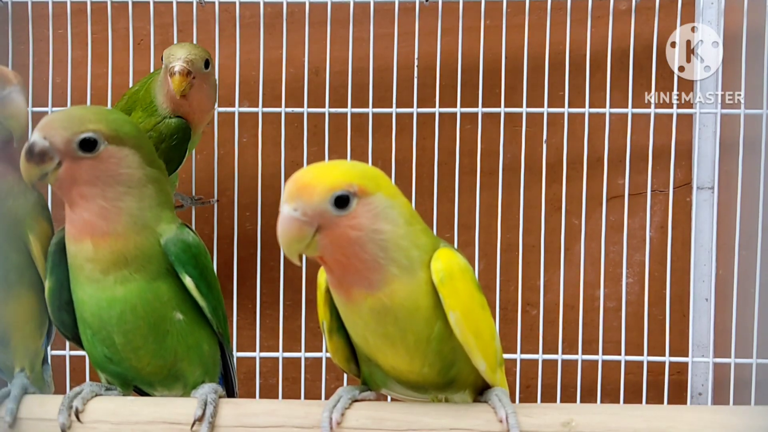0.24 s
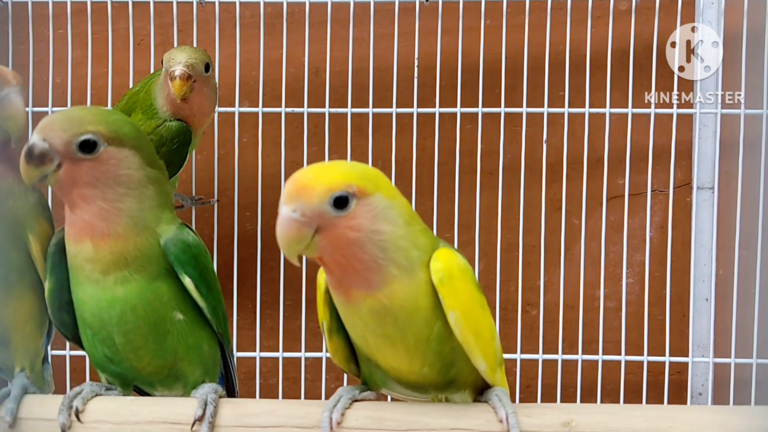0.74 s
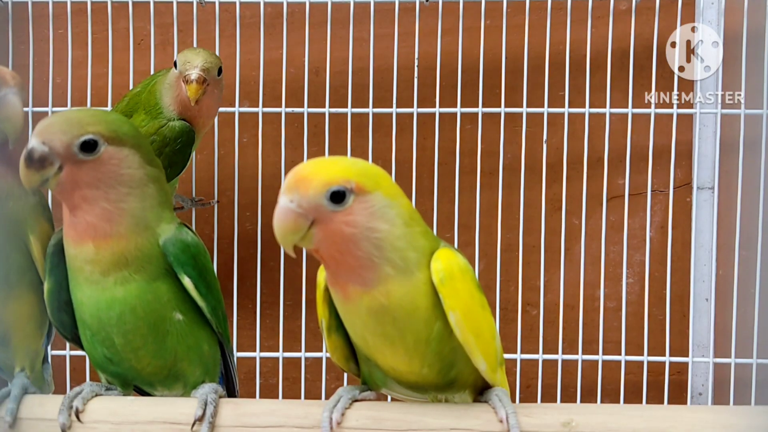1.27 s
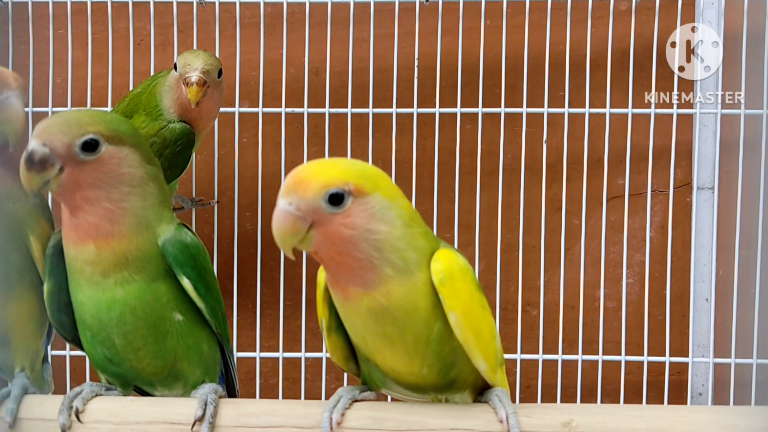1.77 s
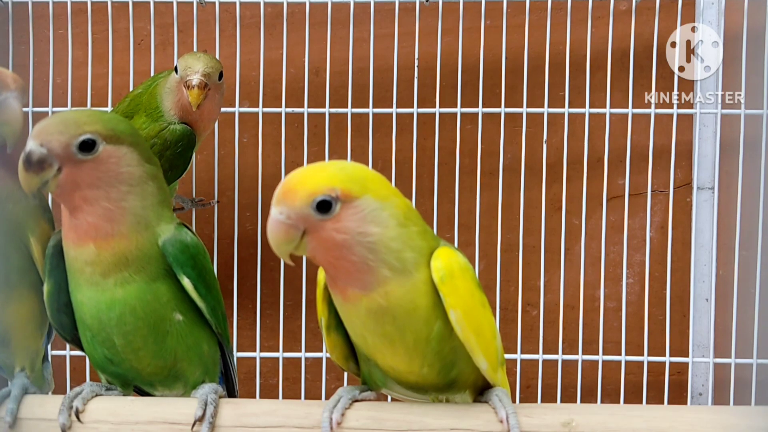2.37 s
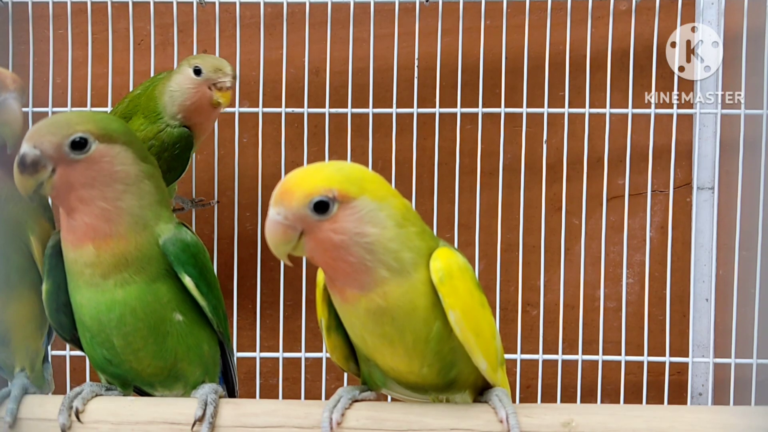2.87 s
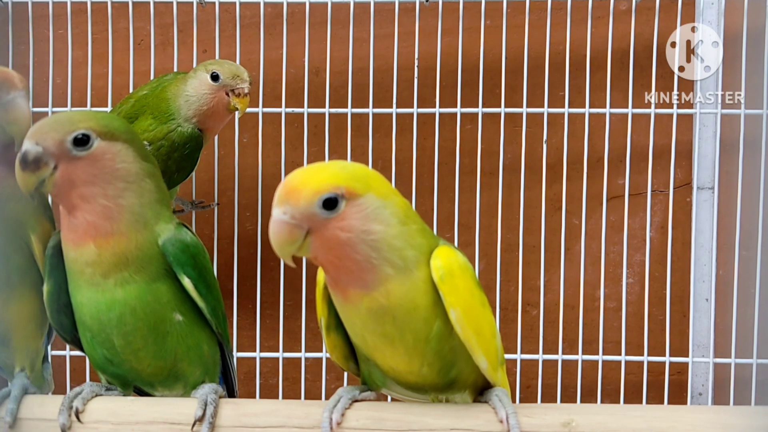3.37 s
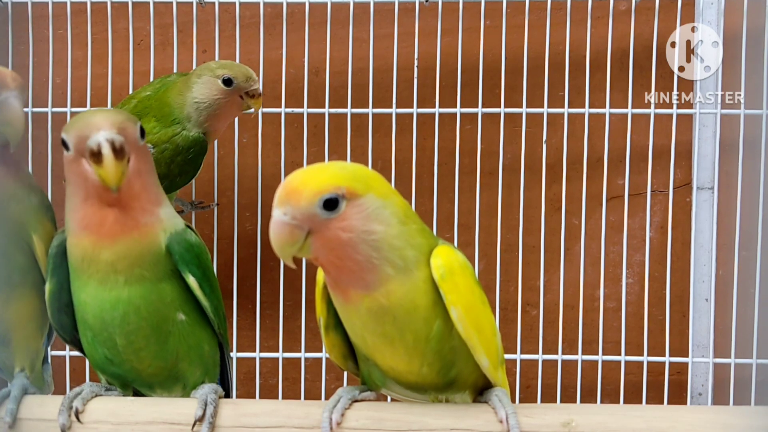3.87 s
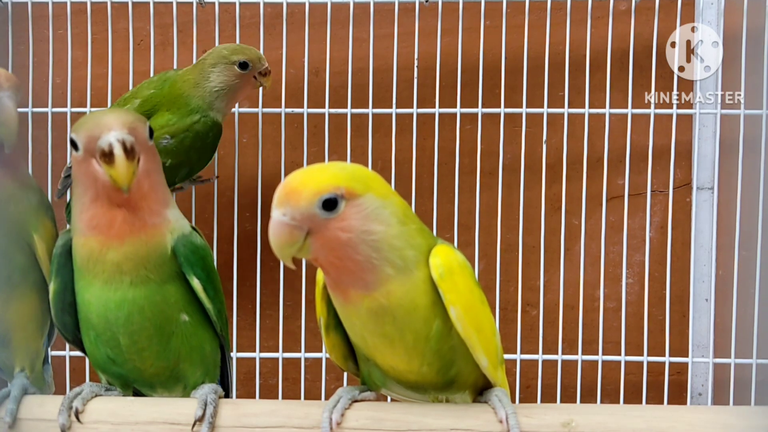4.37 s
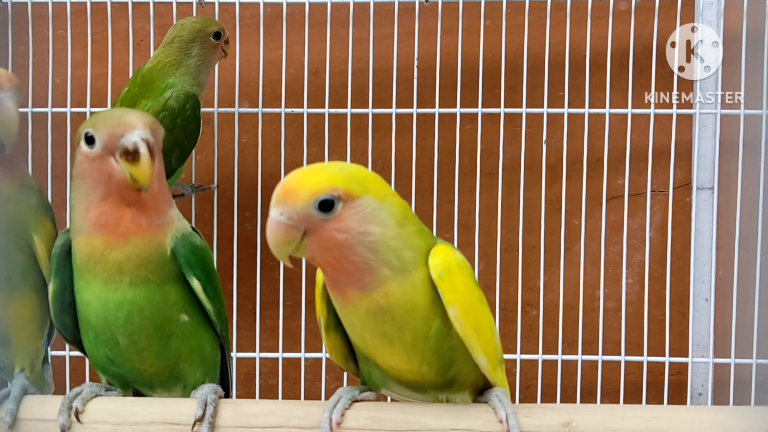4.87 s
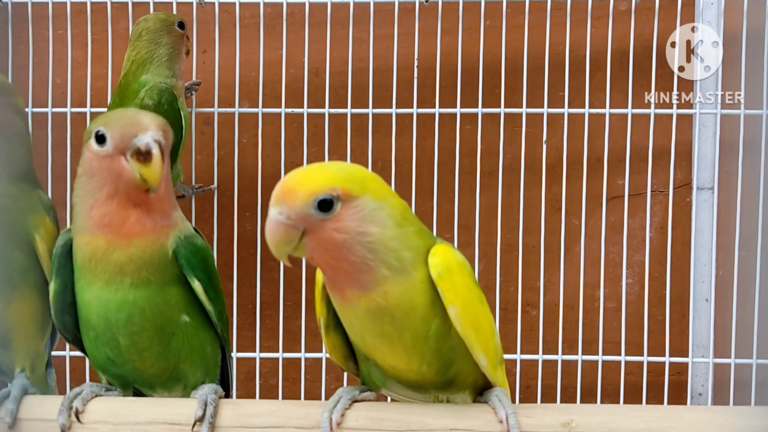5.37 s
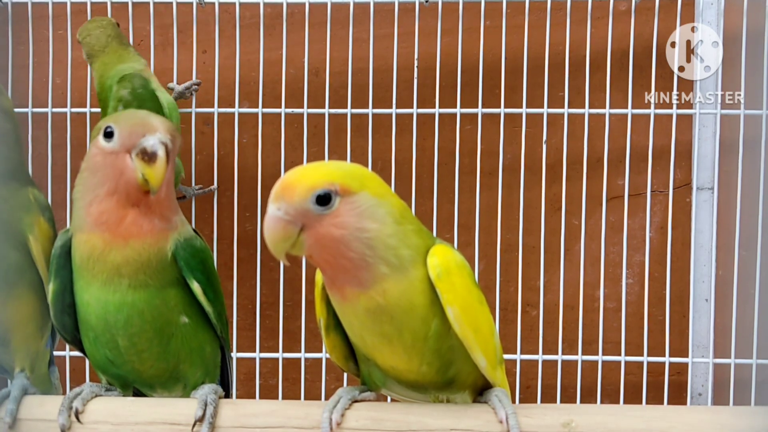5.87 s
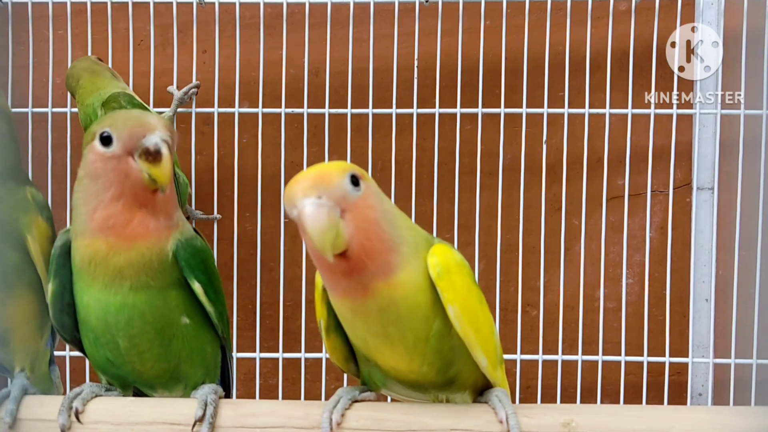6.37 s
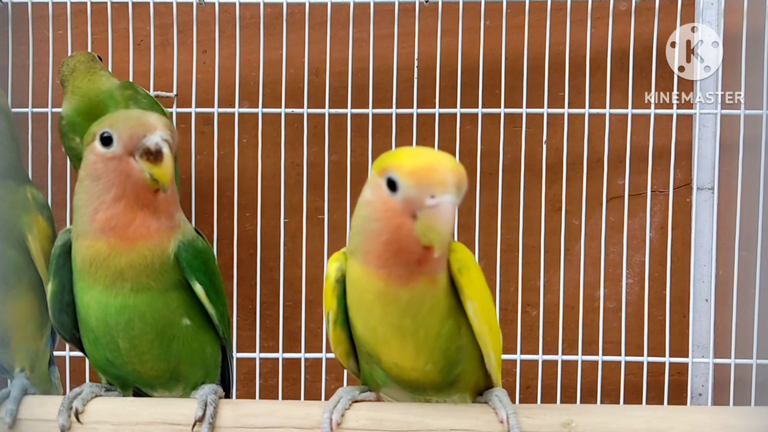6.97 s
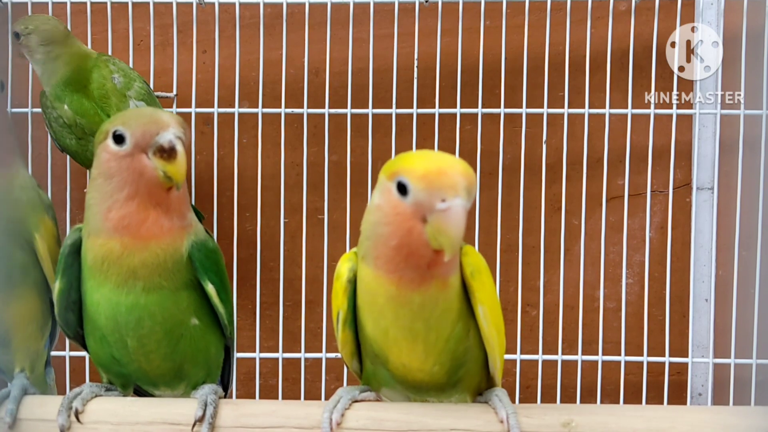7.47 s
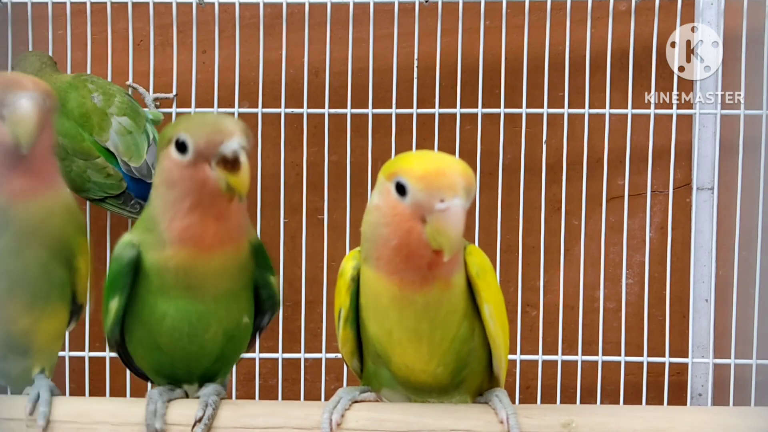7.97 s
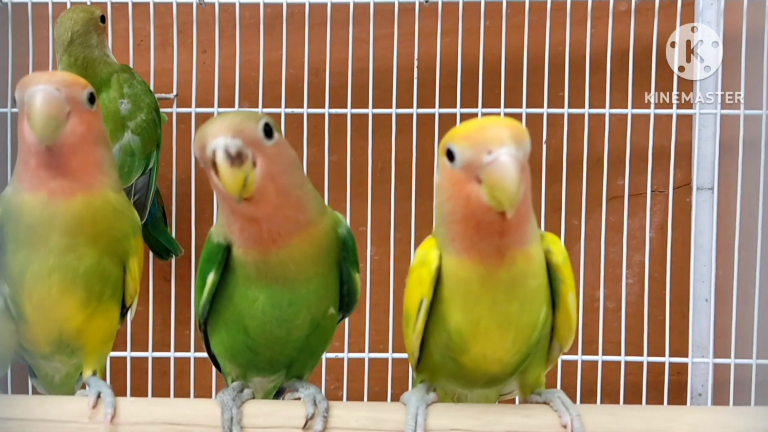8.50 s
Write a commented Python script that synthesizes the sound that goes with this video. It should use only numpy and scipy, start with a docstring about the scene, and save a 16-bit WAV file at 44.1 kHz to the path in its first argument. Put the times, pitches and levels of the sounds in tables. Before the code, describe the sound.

Close stereo microphone, small hard room, quiet low-heavy room tone. At 0 s the tail of a chirp runs into a shrill, raspy stepped chirp, another at 0.1; each lasts about a twentieth of a second. A very faint one follows at 0.35, with a soft low hum fading by 1.3. Two loud, lower, harsh chirps come at 1.2 and 1.3, one at 3.2, each loud one with a dull microphone thump. A faint far crow calls between 0.5 and 4; distant echoing whistles slide mostly downward from 2 to 6.4. Light wire ticks at 4.3 and 4.5 precede three soft chirps from 4.5, then loud ones at 4.8 and 4.9. Another chirps at 6.2. From 6.4 a faint motor whine rises over hiss and holds; soft perch knocks around 6.5-7.1. At 8.1-8.35 a hop brings claw scrapes, gusts and rattle, then three piercing chirps at 8.4, 8.45 and 8.55.

```python
"""Lovebirds in a wire cage, close to a two-port microphone in a hard room, over steady room tone.
The end of a shrill stepped chirp leads into others; the harmonic chirps overload the microphone with thumps.
A filtered-noise drone swells early, an arched crow call and sliding whistles follow far off, and noise
bursts knock on the perch and tick on the wire. Past six seconds a small motor spins up, a whine over hiss;
then one bird hops, its gusts and rattle made of slow noise, and the last loud chirps close the scene."""
import sys
import numpy as np
from scipy import signal
from scipy.fft import rfft, irfft
from scipy.io import wavfile

SR = 44100
rng = np.random.default_rng(int(sys.argv[2]) if len(sys.argv) > 2 else 0)


def transcribe(u):
    """Save the signal u as a 16-bit wav file named by the first command-line argument.

    u: samples, shape (n,) or (channels, n), limited to [-1, 1]; the rate is SR.
    q: integer samples, one column per channel.
    """
    v = np.clip(np.atleast_2d(u).T, -1, 1)
    q = np.round(v * 32767).astype(np.int16)
    wavfile.write(sys.argv[1], SR, q)


N = 385434


def undb(db):
    """Level to amplitude: 20 dB is a factor of ten."""
    return 10 ** (np.asarray(db) / 20)


def unit(x):
    """Normalisation to a root-mean-square of 1."""
    return x / np.sqrt(np.mean(x ** 2))


def band(x, hz, width_hz):
    """Second-order resonance with gain 1 at its centre."""
    return signal.lfilter(*signal.iirpeak(min(hz, .45 * SR), hz / width_hz, SR), x)


def steep(x, hz, width_hz):
    """Cascaded resonance: the same one twice, for steeper skirts."""
    return band(band(x, hz, width_hz), hz, width_hz)


def lowpass(x, order, hz):
    """Butterworth treble loss above hz."""
    return signal.sosfilt(signal.butter(order, hz, fs=SR, output="sos"), x)


def wander(n, rate_hz):
    """Low-passed noise: smooth chance of spread about 1 that turns about rate_hz times a second."""
    return unit(lowpass(rng.standard_normal(n + 2000), 4, rate_hz)[2000:])


def add(out, s, x, pan_db=0):
    """Superposition: mixes x in at s seconds, pan_db stronger on the left than on the right."""
    i = int(s * SR)
    out[:, i:i + x.shape[-1]] += x[..., :N - i] * undb([[pan_db / 2], [-pan_db / 2]])


def echoes(x, t60_s):
    """Diffuse reverberation: decaying noise of unit energy, unrelated at the two ports."""
    t = np.arange(int(.9 * SR)) / SR
    tail = rng.standard_normal((2, len(t))) * 10 ** (-3 * t / t60_s) * (t > .001)
    tail = tail / np.sqrt(np.sum(tail ** 2, axis=1, keepdims=True))
    return signal.fftconvolve(x, tail, axes=1)[:, :N]


# chirps and ticks below this level are duller; such chirps are also thinner
SOFT_BELOW_DB, SOFT_TOP_HZ, SOFT_LOW_HZ = -20, 9400, 3800
SOFT_T60_S, SOFT_ECHO_DB = 0.27, -3
EARLIER_S, EARLIER_DB = .012, -11.5  # the end of an earlier chirp
# Chirps that sweep up, hold a note and drop to a closing note, one a row:
# [opens t/s, holds t/s, drops t/s, ends t/s, sweep from f/Hz, sweep to f/Hz, hold from f/Hz, hold to f/Hz,
#  closing f/Hz, beak resonance sweeping f/Hz, held f/Hz, closing f/Hz, relative held level/dB,
#  relative closing level/dB, roughness/1, relative thump left level/dB, right level/dB]
CHIRP_NOTES = [ (0.008, 0.027, .040, .062, 1393, 1900, 4313, 4768, 4784, 5900, 9010, 9000, -17.5, -19, 0.87, -46, -35),
               (0.112, 0.127, .141, .165, 1417, 2110, 4240, 4815, 4830, 5430, 9010, 9000, -16.5, -19.5, 0.92, -38, -30.5),
               (0.325, 0.378, .43, .45, 2490, 2490, 3140, 3780, 3680, 6500, 6500, 7200, -52.5, -57, 1.12, -62, -70),
               (1.204, 1.231, 1.259, 1.285, 1640, 2344, 2560, 2539, 2327, 7520, 5850, 6840, -12, -12, 0.58, -25.5, -16),
               (1.313, 1.328, 1.366, 1.390, 1844, 1874, 2494, 2640, 2348, 7300, 6240, 6670, -16, -9.5, 0.33, -32.5, -22),
               (3.178, 3.195, 3.226, 3.252, 1552, 1930, 1929, 2080, 2099, 7200, 7280, 6260, -12.5, -13, 0.41, -25.5, -16),
               (4.533, 4.544, 4.556, 4.566, 1815, 2400, 2115, 2147, 2144, 8150, 6230, 6330, -32.5, -34.5, 0.72, -62, -59),
               (4.619, 4.641, 4.650, 4.658, 2400, 2950, 4970, 5040, 4850, 8400, 9300, 9500, -32, -45, 0.6, -55, -61),
               (4.718, 4.744, 4.755, 4.768, 1830, 2260, 4920, 4980, 4780, 8600, 9090, 9650, -30.5, -33, .55, -58.5, -58),
               (4.785, 4.795, 4.839, 4.855, 1571, 2500, 2125, 2533, 2335, 7200, 6810, 6900, -12, -11.5, 0.7, -24, -24),
               (4.912, 4.926, 4.947, 4.965, 1762, 2030, 2395, 2635, 2250, 7100, 7030, 6570, -16.5, -16.5, 0.95, -39.5, -35.5),
               (6.204, 6.236, 6.264, 6.287, 1414, 2054, 2087, 1994, 2077, 7670, 5560, 5210, -16, -16.5, 0.74, -38.5, -36.5),
               (8.371, 8.383, 8.395, 8.408, 1430, 2250, 4350, 4810, 2250, 7670, 8060, 6240, -10.5, -15.5, 0.78, -29, -34),
               (8.448, 8.464, 8.48, 8.490, 1785, 2400, 4350, 4463, 2214, 8200, 8150, 6100, -14, -21.5, 0.8, -26, -33.5),
               (8.537, 8.551, 8.565, 8.582, 1490, 2216, 4170, 4277, 2146, 7850, 7870, 5650, -13, -18.5, 0.88, -22.5, -30),
               ]


def chirps():
    """Direct and reverberant sound: loud chirps stay clear, soft ones are thin, dull and mixed with echoes."""
    loud, soft = np.zeros((2, 2, N))
    for row in CHIRP_NOTES:
        held_db = row[-5]
        add(soft if held_db < SOFT_BELOW_DB else loud, row[0], chirp(row), -1.2)
    add(loud, 0, chirp(CHIRP_NOTES[0])[-int(EARLIER_S * SR):] * undb(EARLIER_DB))
    soft = signal.sosfilt(signal.butter(2, SOFT_LOW_HZ, "high", fs=SR, output="sos"), soft)
    soft = undb(-0.5) * soft + undb(SOFT_ECHO_DB) * echoes(soft, SOFT_T60_S)
    return loud + lowpass(soft, 4, SOFT_TOP_HZ)


SYRINX_TILT_DB = -2  # per harmonic
BEAK_WIDTH_HZ, WINDPIPE_HZ, WINDPIPE_WIDTH_HZ, WINDPIPE_DB = 820, 2618, 310, 12.5
# spread of pitch, fast and slow, as a share of it at full roughness
WOBBLE, FLUTTER_HZ, STRAY, STRAY_HZ = .028, 450, .025, 110
FLUTTER_DB, BREATH_DB = 6, -7  # level flutter and breath at full roughness
# fundamentals above this are strong if the closing note is high too, else weak; overtones near it are weak
HIGH_NOTE_HZ, HIGH_NOTE_DB, VALLEY_DB = 3960, 14.5, -7


def chirp(row):
    """Source-filter voice: syrinx harmonics under beak and windpipe resonances, roughened by modulation."""
    t, hz, db, beak_hz, beak_db, rough = voice(row)
    held_hz, close_hz = row[6], row[8]
    unsteady = WOBBLE * wander(len(t), FLUTTER_HZ) + STRAY * wander(len(t), STRAY_HZ)
    phase = 2 * np.pi * np.cumsum(hz * (1 + rough * unsteady)) / SR
    # a rough voice weakens every other beat, a high one two in three, which adds partials between the harmonics
    beats = 3 if held_hz > HIGH_NOTE_HZ else 2
    k = np.arange(2, 10 * beats)[:, None] / beats
    partial_hz = k * hz

    def peak(centre_hz, width_hz):
        return 1 / (1 + ((partial_hz - centre_hz) / width_hz) ** 2)

    high_db = (hz > HIGH_NOTE_HZ) * (HIGH_NOTE_DB if close_hz > HIGH_NOTE_HZ else VALLEY_DB / 2)
    size_db = SYRINX_TILT_DB * k - (6.5 + 2 * rough) * (partial_hz < 3000)
    size_db = size_db + beak_db * peak(beak_hz, BEAK_WIDTH_HZ)
    size_db = size_db + np.where(k == 1, high_db, VALLEY_DB * peak(HIGH_NOTE_HZ, WINDPIPE_WIDTH_HZ))
    size_db = size_db + WINDPIPE_DB * peak(WINDPIPE_HZ, WINDPIPE_WIDTH_HZ)
    size = undb(size_db) * (partial_hz < 17000)
    size = size * np.where(k % 1 > 0, .28 * rough ** 1.4, 1)  # the partials between the harmonics
    size = size / np.sqrt(np.sum(size ** 2, axis=0) / 2)
    # turbulent air smears each harmonic into a band around it
    smear = 1 + undb(BREATH_DB) * rough * np.array([wander(len(t), 530) for _ in k])
    level = undb(db + FLUTTER_DB * rough * wander(len(t), 250))
    edges = np.clip(np.minimum(t - t[0], t[-1] - t) / .004, 0, 1)
    return np.sum(size * smear * np.sin(k * phase), axis=0) * level * edges


STEP_S = .003  # time the voice takes to jump from note to note
# the sweep swells from OPEN_DB under the held level; the closing note sags by a share of its pitch and fades
OPEN_DB, SWELL_S, SAG, FADE_DB = -13, 0.005, .035, -9
BEAK_DB, CLOSE_BEAK_DB = 15.5, 7  # the beak resonance is louder by the second on the closing note; its width stays the same
# share of the roughness in sweep, hold and closing note; extra rasp around each jump
SWEEP_ROUGH, HOLD_ROUGH, CLOSE_ROUGH, JUMP_ROUGH, JUMP_S = 0.7, 0.7, 1.1, 0.3, .003


def voice(row):
    """Articulation: time, pitch, level, beak resonance and roughness as contours through one chirp."""
    opens, holds, drops, ends, from_hz, to_hz, held_hz, top_hz, close_hz = row[:9]
    sweep_beak_hz, held_beak_hz, close_beak_hz, held_db, close_db, rough = row[9:-2]
    t = np.arange(opens, ends + .004, 1 / SR)
    half = STEP_S / 2
    corners = np.sort([opens, holds - half, holds + half, drops - half, drops + half, ends])

    def by_note(sweep, hold, close):
        return np.interp(t, corners, np.repeat([sweep, hold, close], 2))

    pitches = [from_hz, to_hz, held_hz, top_hz, close_hz, close_hz * (1 - SAG)]
    hz = np.exp(np.interp(t, corners, np.log(pitches)))
    closing = np.clip((t - drops) / (ends - drops), 0, 1)
    db = by_note(held_db, held_db, close_db) + OPEN_DB * np.exp((opens - t) / SWELL_S) + FADE_DB * closing ** 2
    jumps = sum(np.exp(-((t - s) / JUMP_S) ** 2) for s in (holds, drops))
    rough = rough * by_note(SWEEP_ROUGH, HOLD_ROUGH, CLOSE_ROUGH) + JUMP_ROUGH * jumps
    beak_hz = by_note(sweep_beak_hz, held_beak_hz, close_beak_hz)
    return t, hz, db, beak_hz, BEAK_DB + by_note(0, 0, CLOSE_BEAK_DB), np.clip(rough, 0, 1)


THUMP_S, BIAS_HZ, BIAS_WIDTH_HZ = .03, 2.8, 3.6
RATTLE, RATTLE_S = 0.74, .011  # share of the thump, spread in time


def thumps():
    """Damped oscillator: chirps drag the diaphragm down with a rattle; the bias swings back and settles."""
    drags, rattles = np.zeros((2, 2, N))
    t = np.arange(-2600, 0) / SR  # time up to the end of the thump
    for _, _, drops, ends, *_, left_db, right_db in CHIRP_NOTES:
        size = undb([[left_db], [right_db]]) * 2
        noise = rng.standard_normal((2, len(t)))
        rattle = unit(steep(noise, 260, 460) + .12 * band(noise, 600, 1500))
        # with the .004 s delay below, the rattle peaks .0081 s after the drop
        swell = np.exp(-((t + ends - drops - 0.0041) / RATTLE_S) ** 2)
        add(rattles, ends + t[0] + .004, size * RATTLE * rattle * swell)
        add(drags, ends + t[0] + 0.0025, -np.exp(t / THUMP_S) * np.clip(-t / 0.0053, 0, 1) * size)
    w, damp = 2 * np.pi * BIAS_HZ, 2 * np.pi * BIAS_WIDTH_HZ
    settling = signal.lfilter(*signal.bilinear([1, 0, 0], [1, damp, w ** 2], SR), drags)
    return settling + rattles + undb(-11) * echoes(rattles, 0.11)


# Claws on the wire: [t/s, relative peak level/dB, left minus right level/dB, scrape length t/s]
CLAW_TICKS = [(4.316, -26.5, -1, 0.00052), (4.475, -25.5, 2, 0.0007), (6.184, -34.5, 1, 0.0015),
              (7.293, -30.5, -4, 0.00085), (8.1312, -15.5, -6.5, 0.0037), (8.143, -14.5, -3, 0.0046),
              (8.196, -19.5, -17, 0.0012), (8.246, -20.5, -8.5, 0.015), (8.267, -37, -22, 0.0015),
              (8.3074, -18, -24.5, 0.0032)]
# Resonances of the wire: [f/Hz, width f/Hz, relative level/dB]
WIRE_MODES = [(2670, 4100, 13), (7310, 860, 26.5), (13400, 2700, 10.5)]


def ticks():
    """Modal excitation: short scrapes of noise ring the resonances of the wire; soft ones are duller."""
    loud, soft = np.zeros((2, 2, N))
    t = np.arange(2600) / SR
    for s, db, pan_db, length_s in CLAW_TICKS:
        scrape = rng.standard_normal(len(t)) * undb(2.4 * wander(len(t), 700))
        scrape = scrape * np.clip(t / 0.0037, 0, 1) * np.exp(-(t / length_s) ** 2)
        tick = sum(undb(g) * band(scrape, hz, width) for hz, width, g in WIRE_MODES)
        add(soft if db < SOFT_BELOW_DB else loud, s - .001, tick / np.abs(tick).max() * undb(db), pan_db)
    return loud + lowpass(soft, 4, SOFT_TOP_HZ)


GUST_DB = 5  # spread of the gusts and of the unevenness of the shudder
# Wings push air at the ports and the cage rattles as a bird hops:
# [from t/s, to t/s, relative gust level/dB, rattle relative to each tick level/dB, rattle decay t/s]
HOP_AIR = (8.13, 8.35, -10, -12, .015)


def hop():
    """Wind noise and forced vibration: gusts unrelated at the ports, a shudder strongest at each claw grip."""
    start, end, db, rattle_db, rattle_s = HOP_AIR
    out, t = np.zeros((2, N)), np.arange(start, end, 1 / SR)
    gusts = steep(rng.standard_normal((2, len(t))), 26, 59) * undb(GUST_DB * wander(len(t), 28.0))
    grips = undb(-35 + GUST_DB * wander(len(t), 37))
    for s, tick_db, *_ in CLAW_TICKS:
        grips = grips + undb(tick_db) * (t > s) * np.exp(-np.abs(t - s) / rattle_s)
    rattle = unit(band(rng.standard_normal((2, len(t))), 270, 400)) * grips
    swell = np.sin(np.pi * (t - start) / (end - start)) ** 0.098
    add(out, start, (gusts * undb(db) + rattle * undb(rattle_db)) * swell, -4)
    return out


# Dull knocks on the perch: [t/s, relative peak level/dB, f/Hz]
PERCH_KNOCKS = [(0.899, -44.5, 727), (2.556, -47.5, 805), (5.842, -47.5, 790), (6.506, -41, 906),
                (6.816, -39, 820), (7.067, -39, 1410), (7.138, -45, 1000), (7.988, -36, 234)]


def knocks():
    """Impact response: a decaying burst of noise through one broad resonance of the perch."""
    out, t = np.zeros((2, N)), np.arange(2600) / SR
    for s, db, hz in PERCH_KNOCKS:
        burst = rng.standard_normal(len(t)) * np.exp(-t / 0.0326) * np.clip(t / 0.0046, 0, 1)
        knock = steep(burst, hz, 0.4 * hz)
        add(out, s, knock / np.abs(knock).max() * undb(db))
    return out


# whine and cooling air close in on full speed
MOTOR_ON_S, SPIN_UP_S, IDLE_HZ, FULL_HZ = 6.43, 0.47, 3980, 5744
WHINE_START_DB, WHINE_DB = -83, -54.5
HISS_START_DB, HISS_DB, BRIGHT_DB = -58, -48.5, -21  # the last is relative to the blowing


def motor():
    """Exponential spin-up: a wavering whine over turbulent cooling air that rings the ports."""
    since = np.arange(N) / SR - MOTOR_ON_S
    short = np.exp(-np.maximum(since, 0) / SPIN_UP_S)  # share of full speed still to gain
    speed_hz = FULL_HZ - (FULL_HZ - IDLE_HZ) * short
    phase = 2 * np.pi * np.cumsum(speed_hz * (1 + .006 * wander(N, 150))) / SR
    whine = undb(WHINE_DB + (WHINE_START_DB - WHINE_DB) * short ** 2.1 + 2 * wander(N, 45))
    noise = rng.standard_normal((2, N))
    hiss = unit(steep(noise, 7400, 4800)) + 0.87 * unit(band(noise, 2960, 8100))
    blowing_db = HISS_DB + (HISS_START_DB - HISS_DB) * short ** 0.7 + 0.52 * wander(N, 6.4)
    blowing = (since > 0) * undb(blowing_db)
    # a thin bright hiss rises with the motor, over a very faint constant hiss
    bright = unit(steep(rng.standard_normal((2, N)), 12500, 6000))
    bright = bright * (undb(BRIGHT_DB) * blowing + undb(-89.5))
    return (since > 0) * whine * np.sin(phase) * undb([[-2], [2]]) + hiss * blowing, bright


CAW_S = .14
# Far crow, an arched note each: [t/s, relative level/dB, pitch f/Hz]
CROW_CAWS = [(0.488, -56, 598), (0.8, -58, 520), (2.812, -58, 592), (3.4, -56.5, 596), (4.052, -61, 592)]
# Resonances of the crow's throat: [f/Hz, width f/Hz, relative level/dB]
THROAT_MODES = [(2400, 780, -8.5), (3228, 1380, -3.5), (4526, 410, -7)]


def crow():
    """Source-filter voice: harmonics and breath noise shaped by the throat resonances."""
    out = np.zeros((2, N))
    for s, db, hz in CROW_CAWS:
        u = np.linspace(0, 1, int(CAW_S * SR))
        arch_hz = hz * (1 - .25 * (u - .5) ** 2)
        phase = np.cumsum(arch_hz * (1 + .008 * wander(len(u), 150))) / SR
        pulses = sum(np.sin(2 * np.pi * k * phase) for k in range(1, 11)) + rng.standard_normal(len(u))
        caw = unit(sum(undb(g) * band(pulses, f, w) for f, w, g in THROAT_MODES))
        add(out, s, caw * np.sin(np.pi * u) * undb(db + 3 * wander(len(u), 40)), 2)
    return out


FAR_T60_S = 0.76
# Far birds, one slurred whistle each: [t/s, start f/Hz, end f/Hz, level before echoes/dB, length t/s]
BIRD_WHISTLES = [(2.11, 4330, 2796, -48.5, 0.1), (3.035, 3200, 2490, -56, 0.074),
                 (3.3, 3240, 2100, -45, 0.078), (3.62, 3135, 1837, -48, 0.14),
                 (3.967, 3543, 1910, -44, 0.13), (4.288, 3580, 2078, -42.5, 0.095),
                 (4.464, 3110, 2160, -47.5, 0.083), (5.19, 4070, 1902, -44, .05),
                 (5.676, 3220, 2330, -43.5, 0.12), (6.014, 3250, 2417, -45, .13),
                 (6.332, 3180, 2500, -46, 0.13)]


def whistles():
    """Reverberant field: gliding, wavering pure tones heard only through their echoes."""
    far = np.zeros((2, N))
    for s, from_hz, to_hz, db, length_s in BIRD_WHISTLES:
        u = np.linspace(0, 1, int(length_s * SR))
        glide_hz = from_hz + (to_hz - from_hz) * u
        phase = 2 * np.pi * np.cumsum(glide_hz * (1 + 0.04 * wander(len(u), 300))) / SR
        add(far, s, np.sin(phase) * np.sin(np.pi * u) ** .5 * undb(db))
    return echoes(far, FAR_T60_S)


# A low drone: [from t/s, to t/s, f/Hz, level before the swell/dB]
LOW_DRONE = (.27, 1.3, 165, -57.5)


def drone():
    """Narrow-band noise: a soft low hum that swells quickly, is loudest early and fades."""
    start, end, hz, db = LOW_DRONE
    out, u = np.zeros((2, N)), np.linspace(0, 1, int((end - start) * SR))
    hum = steep(rng.standard_normal(len(u)), hz, 56)
    add(out, start, unit(hum) * np.sin(np.pi * u ** 0.21) * undb(db))
    return out


AIR_DB = -55
# Spectrum of the room tone: [f/Hz, relative level/dB]
AIR_SPECTRUM = [(15, -24), (25, -11.5), (260, -20), (2050, -27), (2800, -31), (4600, -36.5), (7510, -26.5),
                (9300, -31), (14300, -64), (22000, -120)]
# Balance of the room tone: [f/Hz, left minus right level/dB]
AIR_BALANCE = [(300, 6), (8000, -3)]


def air():
    """Partial coherence: octaves that swell together and flicker alone, most alike at the ports in the bass."""
    hz = np.maximum(np.arange(N // 2 + 1) * SR / N, 1)

    def shape(table):
        table_hz, table_db = np.array(table).T
        return np.interp(np.log(hz), np.log(table_hz), table_db)

    mid, side = rfft(rng.standard_normal((2, N)))
    apart = np.clip(.45 + hz / 1500, 0, 1)
    both = np.array([mid + apart * side, mid - apart * side]) / np.sqrt(1 + apart ** 2)
    both = both * undb(shape(AIR_SPECTRUM) + np.array([[.5], [-.5]]) * shape(AIR_BALANCE))
    out, swell = 0, wander(N, 1.254)
    for low in range(4, 14):
        share = np.clip(1 - np.abs(np.log2(hz) - low - .5), 0, 1) ** .5
        out = out + irfft(both * share, N) * undb((1 + low / 5) * swell + 2.5 * wander(N, 5))
    return unit(out) * undb(AIR_DB)


PORT_LAG = 8  # samples by which the cage reaches the left port later
NEAR_T60_S, NEAR_DB, ROOM_T60_S, ROOM_DB = .032, -.5, 0.35, -10
PORT_HZ, PORT_WIDTH_HZ = 6500, 5500
BACKGROUND_TOP_HZ = 8800


def scene():
    """Superposition of direct, reflected and background sound at the two ports."""
    near = chirps() + ticks() + knocks()
    near[0] = np.roll(near[0], PORT_LAG)
    close_echoes = undb(NEAR_DB) * echoes(near, NEAR_T60_S)
    room_echoes = undb(ROOM_DB) * band(echoes(near, ROOM_T60_S), PORT_HZ, PORT_WIDTH_HZ)
    machine, bright = motor()
    # the quiet background sounds are dull, with little above BACKGROUND_TOP_HZ; a thin bright hiss is added
    background = crow() + whistles() + machine + air() + drone()
    background = lowpass(background, 14, BACKGROUND_TOP_HZ) + bright
    return undb(2.0) * (near + close_echoes + room_echoes) + hop() + thumps() + background


NOTCH_HZ, NOTCH_WIDTH_HZ, NOTCH_DEPTH = 11300, 1500, .75  # the microphone is partly deaf here
TOP_HZ = 15600


def record(dry):
    """Band limiting and soft saturation: dulls the top octave, rounds the loudest peaks, cuts above TOP_HZ."""
    notched = dry - NOTCH_DEPTH * band(dry, NOTCH_HZ, NOTCH_WIDTH_HZ)
    dull = signal.lfilter(*signal.butter(4, 13600, fs=SR), notched)
    rounded = np.tanh(1.4 * dull) / 1.4
    return signal.sosfilt(signal.ellip(8, .2, 70, TOP_HZ, fs=SR, output="sos"), rounded)


dry = scene()
out = record(dry)
transcribe(out)
```